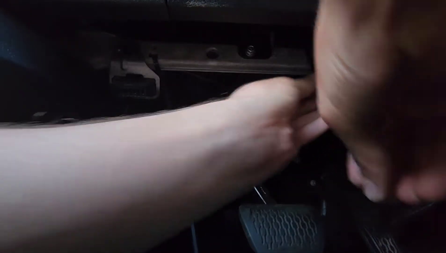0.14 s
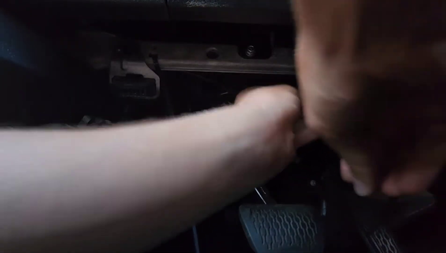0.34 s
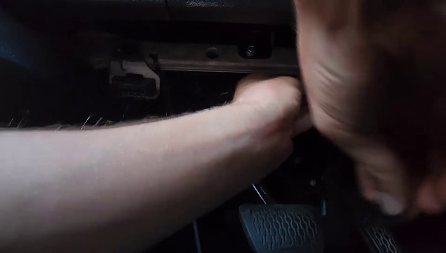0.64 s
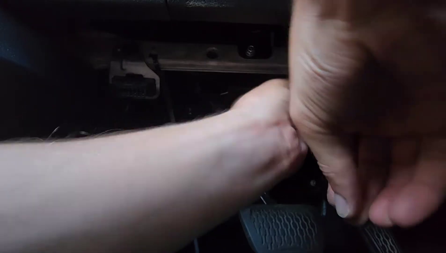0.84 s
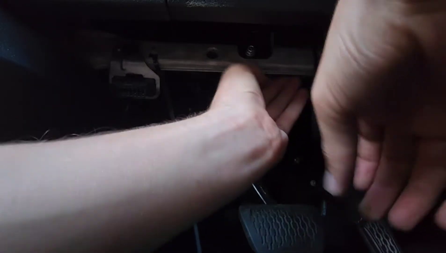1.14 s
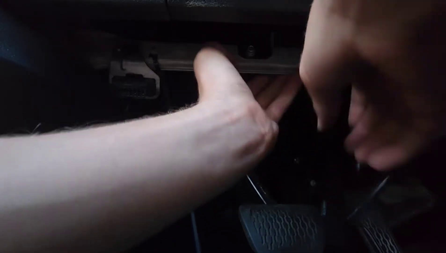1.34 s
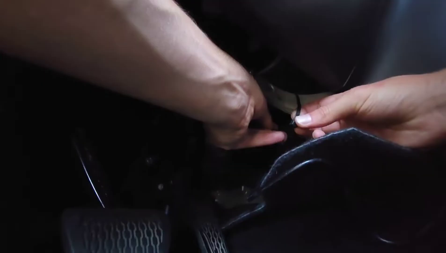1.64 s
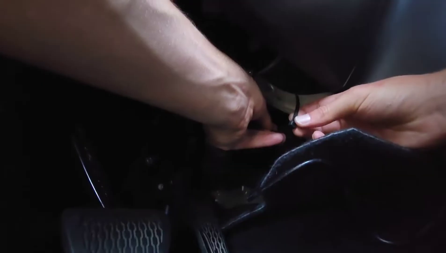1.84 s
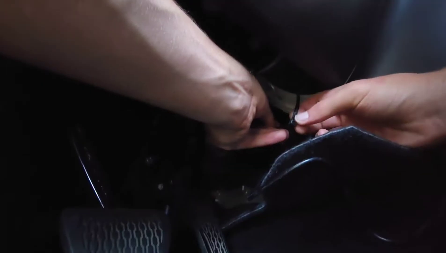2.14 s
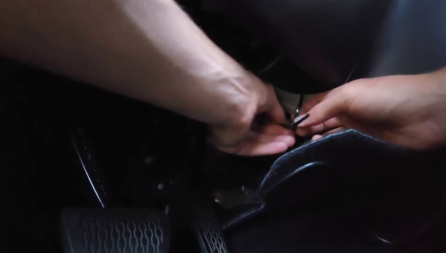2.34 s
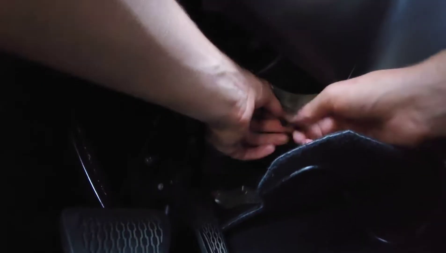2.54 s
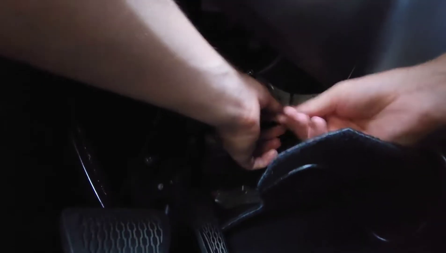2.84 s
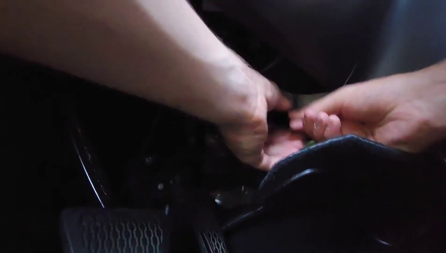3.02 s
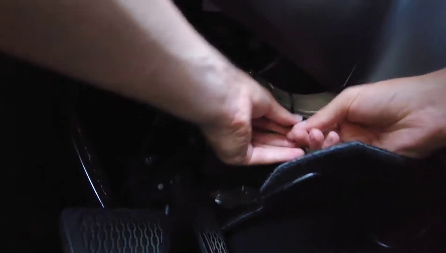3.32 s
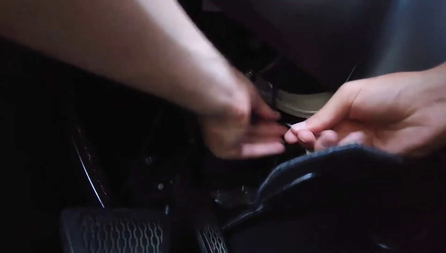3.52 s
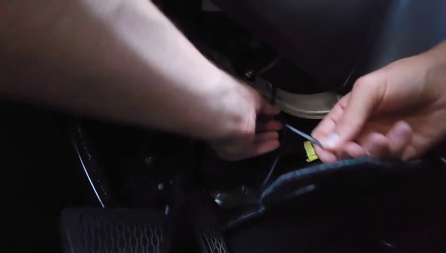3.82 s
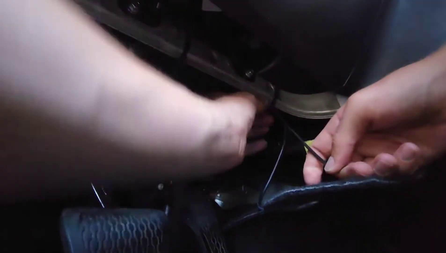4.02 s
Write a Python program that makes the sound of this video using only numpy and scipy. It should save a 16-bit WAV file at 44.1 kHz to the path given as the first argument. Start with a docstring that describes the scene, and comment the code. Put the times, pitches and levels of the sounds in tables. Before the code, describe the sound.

In a closed car footwell, very close stereo microphones catch a nylon tie ratcheting: two brief soft zips and some single clicks, then sleeve rustle, scuffs and dull panel thumps. After the deepest thump comes a short brighter click burst, more finger scuffs, then a longer, fast zip that slows into stuttering teeth. Low unsteady hum runs underneath, and rustling closes the clip.

```python
"""Car footwell, cabin closed: a nylon cable tie is pulled tight by hand, close to two microphones.
Its pawl rattles over the teeth in four pulls, plus single teeth; each snaps and knocks the taut strap.
Fingers scuff trim and mat in gritty noise bursts, a like burst clicks once, panels thump as low
decaying modes, sleeves rustle as shaped noise, and the cabin hums low with resonant noise and
an unsteady tone."""
import sys
import numpy as np
from scipy import signal
from scipy.fft import rfft, irfft, next_fast_len
from scipy.io import wavfile
from scipy.ndimage import uniform_filter1d, map_coordinates

SR = 44100
rng = np.random.default_rng(int(sys.argv[2]) if len(sys.argv) > 2 else 0)


def int16_out(signal):
    """Quantize to a 16-bit WAV file."""
    q = np.round(np.clip(np.atleast_2d(signal).T, -1, 1) * 32767)
    wavfile.write(sys.argv[1], SR, q.astype(np.int16))


def rack_gain(trim_db):
    """Turn a fader trim in dB into the linear factor to multiply a signal by."""
    fader = np.asarray(trim_db, float)
    return 10 ** (fader / 20)


N = 184117

# Levels are relative unless marked rms; spectra give density shapes.
# left-right correlation, used below 600 Hz: f/Hz, correlation
LIKENESS = [(60, 0.99), (180, 0.97), (550, -0.01), (1650, 0.075), (4970, -0.05), (15000, 0.04)]

# cabin air modes, lower and upper group, response before squaring: f/Hz, width/Hz, level/dB
AIR_MODES = [
    [(54.83, 9.7, -3.5), (43.6, 30, -12)],
    [(118.9, 27.8, 1), (79.4, 14.3, -1.5)],
]
# hum of lower and upper group: level/dB rms
HUM_RMS_DB = [-47, -46.5]
# low tone, mean course: t/s, f/Hz, level/dB rms
DRONE_COURSE = [(0, 48.5, -47), (1.6, 48.5, -50), (1.64, 54, -52), (4.17, 54, -47.5)]
# cabin floor spectrum: f/Hz, level/dB
FLOOR_SPECTRUM = [(12, -37), (20, -11), (117, -8), (141, -11), (200, -24), (307, -21.5), (360, -25),
                  (434, -24.5), (666, -46), (969, -35), (1750, -66), (4700, -67.5), (12000, -84.5),
                  (15600, -108), (22000, -120)]
FLOOR_MEAN_DB = -50

# sleeve movement: t/s, fine rustle level/dB, dull rustle level/dB
SLEEVE_MOVES = [(0.0, -84, -51), (0.09, -75, -59.5), (0.195, -58, -46.5), (0.28, -64, -51),
                (0.38, -74, -58.5), (0.56, -77.5, -47), (0.62, -87.5, -65), (0.722, -74.5, -56),
                (0.85, -87, -67), (1.14, -88, -68), (1.175, -67, -55), (1.235, -55, -52),
                (1.285, -63.5, -52), (1.33, -79, -56.5), (1.396, -63, -53), (1.45, -91, -63),
                (1.6, -77, -57.5), (1.63, -95, -69.5), (2.05, -95.5, -69.5), (2.12, -100, -51),
                (2.22, -77, -54), (2.25, -67, -62), (2.4, -80, -62), (2.5, -81.5, -65), (2.622, -65, -55.5),
                (2.73, -73, -66.5), (2.92, -83, -66), (3.08, -72, -62.5), (3.14, -64, -55.5),
                (3.252, -85.5, -70), (3.79, -70.5, -51.5), (3.85, -68, -55.5), (3.865, -58, -51),
                (3.944, -57.5, -50), (3.975, -67, -51), (4.0, -56.5, -49.5), (4.17, -56.5, -43)]
# fine rustle spectrum: f/Hz, level/dB
FIBRE_SPECTRUM = [(3500, -32.5), (6500, -15), (9500, -5.5), (12500, -4), (15200, -5.5), (16200, -12),
                  (16600, -36.5)]
# middle rustle spectrum: f/Hz, level/dB
CLOTH_SPECTRUM = [(1470, -22.5), (2500, -3.5), (3800, -1.5), (6500, -2), (9000, -6.5), (13000, -30),
                  (17000, -60.5)]
# dull rustle spectrum: f/Hz, level/dB
NAP_SPECTRUM = [(120, -29), (200, -2.5), (286, -4), (595, -13.5), (793, -20), (1380, -17), (3500, -31),
                (4550, -61.5), (7700, -120)]
MIDDLE_OFFSET_DB = -3.5  # re halfway between fine and dull

# finger scuffs, and a short click at 1.613 s:
# t/s, level/dB, dull part re bright/dB, rise/ms, length/ms
BURST_EVENTS = [(0.0138, -36, 4.5, 0.19, 1.9), (0.582, -48, 6, 2.8, 18), (0.664, -49.5, 16, 1.3, 10.5),
                (0.7063, -51, 6, .5, 6.6), (0.7533, -49.5, 11, 0.26, 23), (0.7726, -51, 8, 2.1, 15),
                (0.8598, -60.5, 13, 0.33, 9.4), (1.1578, -41, 3.5, 0.2, 6), (1.3117, -49.5, 3, .3, 18),
                (1.38, -48.5, -4, 0.92, 23), (1.4075, -34, 3.5, 0.8, 15.8), (1.582, -56.5, -5, 1.1, 16),
                (1.613, -52.5, 4, 0.45, 8), (2.0665, -48, 10, 0.18, 47), (2.0966, -56, 6, 1.4, 57),
                (2.3717, -50, 23, .2, 5), (2.5547, -53.5, -2, .4, 8), (2.5956, -35, -4, 0.16, 4.1),
                (2.6677, -45, -5.5, 0.3, 8.7), (2.8225, -53.5, -4.5, 2.7, 7.5), (2.8844, -56, 5, 2.3, 39),
                (2.9046, -34.5, -9, 2.8, 22.3), (2.93, -31.5, -1.5, 4.8, 9.4),
                (3.0093, -44, 2.5, 0.21, 17.7), (3.0885, -41.5, 1, 0.21, 9.3), (3.1133, -44, -4.5, 1.5, 18),
                (3.334, -58.5, -3.5, 4.3, 17)]
# bright part of a burst: f/Hz, level/dB
BRIGHT_SPECTRUM = [(1470, -43), (2500, -8), (4700, -2.5), (5730, -9), (8770, -9), (9800, -14),
                   (15100, -14.5), (16500, -49)]
# dull part of a burst: f/Hz, level/dB
DULL_SPECTRUM = [(290, -68.5), (500, -2.5), (644, -23.5), (1050, 4.5), (1380, -5.5), (2060, 1),
                 (2880, -7.5), (3500, -27), (4550, -44), (7700, -120)]
BURST_PAN_DB, BURST_SPREAD_DB = 2, 3.5  # left-right mean and standard deviation

# one table a pull: t/s, tooth rate/Hz, snap level/dB, strap level/dB
PULL_COURSES = [
    [(.0983, 128.5, -39, -45.5), (.115, 133.8, -36.5, -45), (.125, 243.6, -38.5, -44.5),
     (.15, 250, -36, -42.5), (.17, 208.2, -43.5, -45.5), (.19, 114.2, -52, -53)],
    [(.4458, 124.6, -46, -48.5), (.465, 204.7, -52.5, -51), (.478, 407.7, -39, -43.5),
     (.5, 449.7, -38.5, -42.5), (.528, 367, -40, -44.5), (.552, 205.6, -50.5, -65)],
    [(2.4188, 140, -28.5, -47.5), (2.43, 180.8, -28, -49), (2.442, 170, -25.5, -47),
     (2.448, 134.8, -24, -50), (2.459, 127.9, -26.5, -55)],
    [(3.4498, 144.4, -33.5, -57.5), (3.465, 187.5, -30, -55.5), (3.485, 417, -25, -66),
     (3.499, 674.5, -24, -33), (3.524, 671.4, -27, -33.5), (3.532, 533, -26.5, -35),
     (3.546, 509.2, -29, -28), (3.564, 477.5, -29.5, -39.5), (3.574, 520.7, -27.5, -37),
     (3.607, 521.3, -30.5, -40.5), (3.625, 290, -30.5, -48.5), (3.64, 134.2, -35, -47),
     (3.66, 104, -32.5, -49.5), (3.68, 174.6, -33, -47), (3.705, 290, -29.5, -39), (3.72, 285.5, -30, -45),
     (3.75, 277, -33, -51), (3.768, 135, -38, -60)],
]
# hold of each pull: left-right/dB, snap dullness/dB, bundle level/dB, loop starts closing t/s
PULL_HOLDS = [(0.5, -9.5, -49.5, .098), (1, -5, -52.5, .446), (1, -15.5, -70, 3.5), (2, -9, -42.5, 3.535)]
# single teeth: t/s, snap level/dB, strap level/dB, left-right/dB, snap dullness/dB
SINGLE_TEETH = [(0.3861, -38.5, -49.5, -0.5, -12), (0.4316, -52.5, -51, -1, -7),
                (0.595, -36.5, -54.5, -0.5, -9.5), (0.6894, -32.5, -52.5, -1.5, -8.5),
                (2.4704, -28.5, -52.5, 0.5, -12.5)]
# pawl snap spectrum: f/Hz, level/dB
PAWL_SPECTRUM = [(5290, -51.5), (9000, -20), (9640, -7), (14600, 3.5), (16000, -3.5), (16300, -7.5),
                 (16500, -34.5)]
# tie head under a snap, spectrum: f/Hz, level/dB
HEAD_SPECTRUM = [(1470, -43), (2500, -23.5), (2770, -1), (3620, -16.5), (4780, -2.5), (5150, -15.5),
                 (5590, -4), (6020, -2.5), (6600, -1), (7000, -9), (7400, 0.5), (9000, 1), (11700, -25.5),
                 (19800, -120)]
# taut strap modes: f/Hz, width/Hz, level/dB
STRAP_MODES = [(836, 120, -1), (1000, 82, 8.5), (1376, 230, 3.5), (1645, 140, 5), (1830, 440, 3),
               (3180, 400, -2), (4000, 790, -7)]
# strap silent between two modes: f/Hz, width/Hz
STRAP_NOTCH = (2496, 260)
# tied bundle modes: f/Hz, width/Hz, level/dB
BUNDLE_MODES = [(273, 47, 4.5), (538, 72, -0.5)]
CLOSING_S, LOOSE_DB = .008, -29  # loop closing time; bundle level offset while loose
POSTURE_SAMPLES = SR // 18  # the hands hold one posture this long
REPEAT_SHARE = 0.57  # power share of the pawl snap common to all teeth of one posture
STRAP_LOW_HZ = 850  # the thin strap radiates little below this
STRAP_TURN_RAD = .62  # the microphones see the strap from different sides
TIE_WALLS_DB = 0  # walls re direct snap

# panel thumps: t/s, level/dB, upper modes re own level/dB, starting pitch factor (approximate)
THUMP_EVENTS = [(0.689, -46.5, 2, 1.04), (0.757, -33.5, -7.5, 1.06), (1.159, -38, -2.5, 1.14),
                (1.225, -34, -6.5, 0.89), (1.413, -32, -3.5, 1.5), (1.454, -32, -5, 0.85),
                (2.068, -35, -6, 1.37), (2.097, -20, -17.5, 1.032), (2.186, -40.5, -5, 0.86),
                (2.255, -32, -32, 0.91), (2.374, -48, 3, 1.3)]
# panel modes, the first two are the lowest: f/Hz, level/dB, t60/s
PANEL_MODES = [(108.3, 2, 0.31), (80.3, -1.5, 0.28), (170, 9, 0.1), (250, 2, 0.13), (290, -2.5, 0.11),
               (346, -8, 0.069), (502, -7, 0.058)]

TOP_HZ = 16000


def unit(x):
    """Scales to rms 1."""
    return x / np.sqrt(np.mean(x ** 2) + 1e-20)


def along(points, hz):
    """Interpolates (Hz, value) points on a log frequency axis."""
    f, v = np.transpose(points)
    return np.interp(np.log(hz + 1), np.log(f + 1), v)


def curves(rows):
    """One value per sample for each column after the time."""
    s, *columns = np.transpose(rows)
    return [np.interp(np.arange(N) / SR, s, column) for column in columns]


def wobble(rate_hz):
    """Smooth random curve with rate_hz knots a second."""
    knots = rng.standard_normal(int(N * rate_hz / SR) + 4)
    return map_coordinates(knots, [np.arange(N) * rate_hz / SR])


def filtered(x, response):
    """Applies a complex frequency response."""
    n = x.shape[-1]
    m = next_fast_len(n + 8192)
    return irfft(rfft(x, m) * response(np.fft.rfftfreq(m, 1 / SR)), m)[..., :n]


def resonances(modes):
    """Causal response of second-order modes in alternating polarity."""
    def response(f):
        total = 0
        for k, (centre, width, db) in enumerate(modes):
            damping = 1j * f * width
            total = total + (-1) ** k * rack_gain(db) * damping / (centre ** 2 - f ** 2 + damping)
        return total
    return response


def hiss(spectrum, count, alike):
    """Coloured noise of rms 1 at two microphones; alike is the common power share."""
    white = rng.standard_normal((3, count))
    common, left, right = filtered(white, lambda hz: rack_gain(along(spectrum, hz)))
    return unit(np.sqrt(alike) * common + np.sqrt(1 - alike) * np.array([left, right]))


def wide(spectrum):
    """Stereo noise of rms 1, alike in the bass and nearly unrelated from 600 Hz up."""
    def mid_side(hz):
        turn = np.arccos(np.where(hz < 600, along(LIKENESS, hz), 0.033)) / 2
        return rack_gain(along(spectrum, hz)) * [np.cos(turn), np.sin(turn)]
    mid, side = filtered(rng.standard_normal((2, N)), mid_side)
    return unit(np.array([mid + side, mid - side]))


def add(out, s, sound, pan_db, wet_db):
    """Places a sound: direct, close reflections and faint tail, different at each microphone."""
    t = np.arange(SR // 8) / SR
    decay = rack_gain(-60 * t / .024) + 0.103 * rack_gain(-60 * t / 0.036)  # t60 in s
    walls = rng.standard_normal((2, len(t))) * decay * (t > .0003)
    walls *= rack_gain(wet_db) / np.linalg.norm(walls, axis=1, keepdims=True)
    walls[:, 0] = 1  # direct sound
    panned = sound * rack_gain(np.outer([.5, -.5], pan_db))
    heard = signal.fftconvolve(panned, walls / np.hypot(1, rack_gain(wet_db)), axes=1)
    start = round(s * SR)
    out[:, start:start + heard.shape[1]] += heard[:, :N - start]


def cabin():
    """Outside rumble excites the closed cabin's air modes, over a dull floor and an unsteady low tone."""
    hum = 0
    for db, modes in zip(HUM_RMS_DB, AIR_MODES):
        response = resonances(modes)
        rumble = filtered(rng.standard_normal(N), lambda f: response(f) ** 2)
        hum = hum + rack_gain(db) * unit(rumble)
    hz, db = curves(DRONE_COURSE)
    phase = 2 * np.pi * np.cumsum(hz + 0.813 * wobble(3)) / SR
    drone = rack_gain(db + 2.2 * wobble(4)) * np.sqrt(2) * np.sin(phase)
    floor = rack_gain(FLOOR_MEAN_DB + .7 * wobble(13)) * wide(FLOOR_SPECTRUM)
    return hum + drone + floor


def sleeves():
    """Cloth rubs in a fine, slightly grainy rustle over a dull one, following the arms."""
    fine_db, dull_db = curves(SLEEVE_MOVES)
    middle_db = (fine_db + dull_db) / 2 + MIDDLE_OFFSET_DB
    rub_db = 2.47 * wobble(30)
    grain = rack_gain(1.2 * wobble(660))
    fine = rack_gain(fine_db) * unit(grain * wide(FIBRE_SPECTRUM))
    middle = rack_gain(middle_db) * unit(grain * wide(CLOTH_SPECTRUM))
    dull = rack_gain(dull_db + 1.86 * wobble(40)) * wide(NAP_SPECTRUM)
    return rack_gain(rub_db) * (fine + middle + dull)


def scuffs_and_click():
    """Short gritty noise bursts: fingers scuffing, and at 1.613 s a click made in the same way."""
    out, ms = np.zeros((2, N)), np.arange(SR // 8) / SR * 1000
    for s, db, dull_db, rise_ms, length_ms in BURST_EVENTS:
        envelope = (1 - np.exp(-ms / rise_ms)) * np.exp(-(ms / length_ms) ** 1.85)
        grit = rack_gain(6.5 * unit(uniform_filter1d(rng.standard_normal(len(ms)), size=40)))
        bright = hiss(BRIGHT_SPECTRUM, len(ms), alike=0.27)
        dull = hiss(DULL_SPECTRUM, len(ms), alike=0.47)
        noise = unit(grit * (bright + rack_gain(dull_db) * dull))
        pan_db = rng.normal(BURST_PAN_DB, BURST_SPREAD_DB)
        add(out, s, rack_gain(db) * envelope * noise, pan_db, wet_db=7)
    return out


def ratchet(out, s, snaps, knocks, pan_db, dull_db):
    """Each tooth cracks, rebounds once, chatters for a few ms and gives the strap one clean knock."""
    t = np.arange(SR // 40) / SR

    def crack(start_s):
        return (t >= start_s) * rack_gain(-60 * np.abs(t - start_s) / 0.0032)

    fade = crack(0) + .7 * crack(.0021) + 0.3 * np.exp(-(t / 0.0078) ** 2)

    def same(spectrum):
        """Pawl and head answer each tooth much the same way, so fast teeth draw spectral lines."""
        answer = fade * hiss(spectrum, len(t), alike=0.47)
        return signal.fftconvolve(snaps[None], answer, axes=1)[:, :len(snaps)]

    envelope = signal.fftconvolve(snaps, fade)[:len(snaps)]
    fresh = envelope * hiss(PAWL_SPECTRUM, len(snaps), alike=0.3)
    pawl = np.sqrt(1 - REPEAT_SHARE) * fresh + np.sqrt(REPEAT_SHARE) * same(PAWL_SPECTRUM)
    head = rack_gain(dull_db + 1.5) * same(HEAD_SPECTRUM)
    add(out, s, rack_gain(9.5) * (pawl + head), pan_db, TIE_WALLS_DB)

    def strap(hz):
        turn = np.exp(1j * STRAP_TURN_RAD * np.array([[1], [-1]]))
        thin = (1j * hz / (STRAP_LOW_HZ + 1j * hz)) ** 3
        node_hz, width_hz = STRAP_NOTCH
        gap = node_hz ** 2 - hz ** 2
        node = gap / (gap + 1j * hz * width_hz)
        return turn * thin * node * resonances(STRAP_MODES)(hz)

    add(out, s, rack_gain(40) * filtered(knocks, strap), pan_db, wet_db=-6)


def tie():
    """The pawl drops off tooth after tooth; at equal typed level, each is scaled down as the rate rises."""
    out, bundle = np.zeros((2, N)), np.zeros(N)
    for pull, (pan_db, dull_db, bundle_db, closing_s) in zip(PULL_COURSES, PULL_HOLDS):
        s0, s1 = pull[0][0], pull[-1][0]
        t = s0 + np.arange(round((s1 - s0 + .03) * SR)) / SR
        start = round(s0 * SR)
        hz, snap_db, strap_db = [column[start:start + len(t)] for column in curves(pull)]
        hz = hz * (t < s1)
        loose = np.clip((closing_s - t) / CLOSING_S + 1, 0, 1)
        loose *= closing_s > s0 + CLOSING_S  # else gripped all through
        gripped_db = bundle_db + LOOSE_DB * loose
        at = np.flatnonzero(np.diff(np.floor(np.cumsum(hz) / SR), prepend=-1))
        luck = rng.standard_normal((len(at), 3))
        each = np.sqrt(200 / hz[at])
        shift = np.round(.035 * luck[:, 0] * SR / hz[at]).astype(int)  # uneven tooth release
        release = np.clip(at + shift, 0, None)
        snaps = np.bincount(release, each * rack_gain(snap_db[at] + 0.5 * luck[:, 1]), len(t))
        knocks = np.bincount(release, each * rack_gain(strap_db[at] + 1.1 * luck[:, 2]), len(t))
        # the hands keep moving, so head and walls answer anew
        for first in range(0, len(t), POSTURE_SAMPLES):
            now = slice(first, first + 2 * POSTURE_SAMPLES)
            mask = np.arange(len(t[now])) < POSTURE_SAMPLES
            ratchet(out, t[first], mask * snaps[now], mask * knocks[now], pan_db, dull_db)
        bundle[start + release] = each * rack_gain(gripped_db[at] + 40 + 0.61 * luck[:, 2])
    for s, db, strap_db, pan_db, dull_db in SINGLE_TEETH:
        one = np.eye(1, SR // 25)[0]
        ratchet(out, s, rack_gain(db) * one, rack_gain(strap_db) * one, pan_db, dull_db)
    add(out, 0, filtered(bundle, resonances(BUNDLE_MODES)), 0, wet_db=-1.5)
    return out


def thumps():
    """Hands and feet bump panels, which ring low, settle in pitch and are alike at both microphones."""
    out, t = np.zeros(N + SR), np.arange(SR // 2) / SR
    for s, db, upper_db, bend in THUMP_EVENTS:
        luck_db = rng.normal(0, 3.9, len(PANEL_MODES))
        phase = 2 * np.pi * (t + (bend - 1) * .035 * (1 - np.exp(-t / 0.0322)))
        ring = 0
        for k, (hz, level_db, t60_s) in enumerate(PANEL_MODES):
            mode_db = level_db + (k > 1) * (upper_db + luck_db[k])
            ring = ring - rack_gain(mode_db - 60 * t / t60_s) * np.sin(hz * phase)
        out[round(s * SR):][:len(t)] += rack_gain(db) * ring * (1 - np.exp(-t / 0.0066))
    return out[:N]


def scene():
    """Sums all sources at the two microphones."""
    return cabin() + sleeves() + scuffs_and_click() + tie() + thumps()


def roll_off(x):
    """The treble ends steeply here."""
    return signal.sosfilt(signal.butter(12, 17000, fs=SR, output="sos"), x)


def record(dry):
    """The camera passes little above its band limit: a smooth 32 dB step down around TOP_HZ."""
    kept = filtered(dry, lambda hz: rack_gain(-32 / (1 + np.exp((TOP_HZ - hz) / 70))))
    return roll_off(kept)


dry = scene()
out = record(dry)
int16_out(out)
```